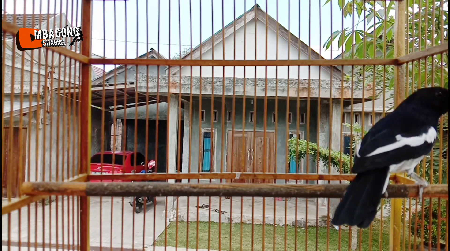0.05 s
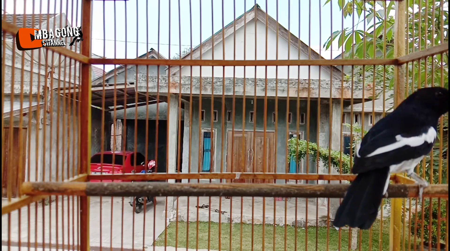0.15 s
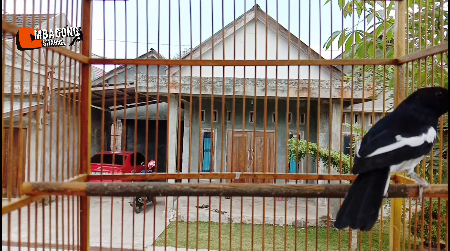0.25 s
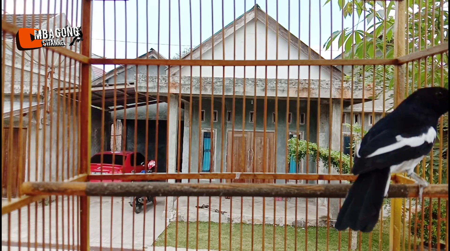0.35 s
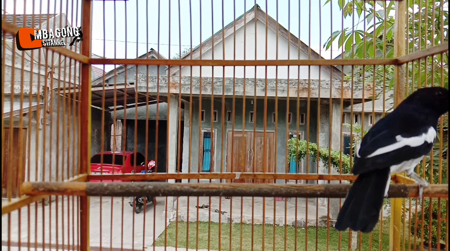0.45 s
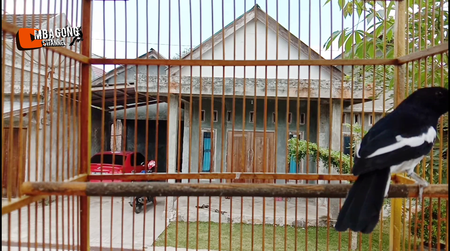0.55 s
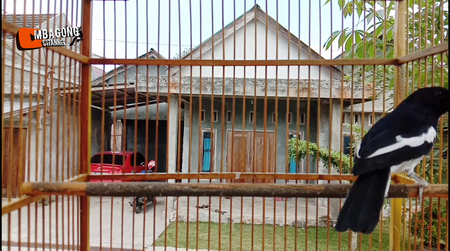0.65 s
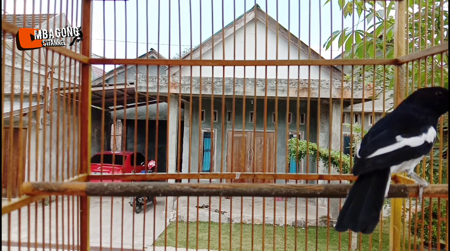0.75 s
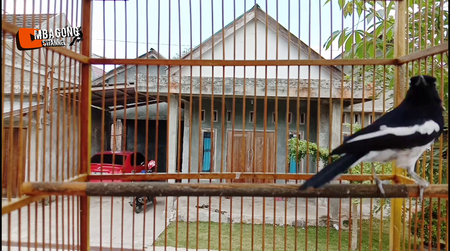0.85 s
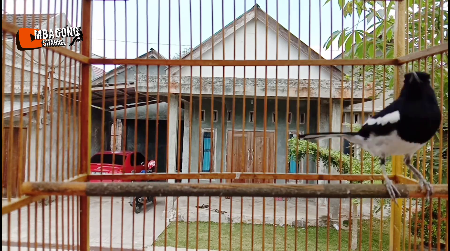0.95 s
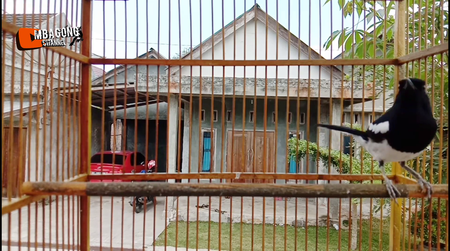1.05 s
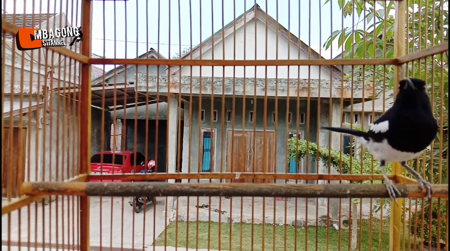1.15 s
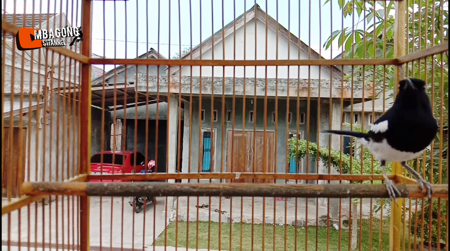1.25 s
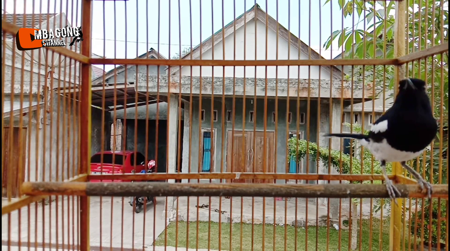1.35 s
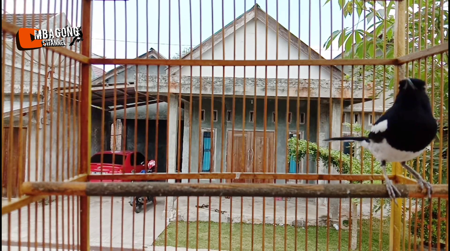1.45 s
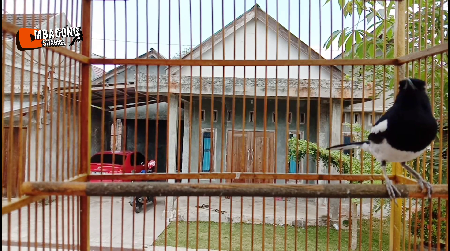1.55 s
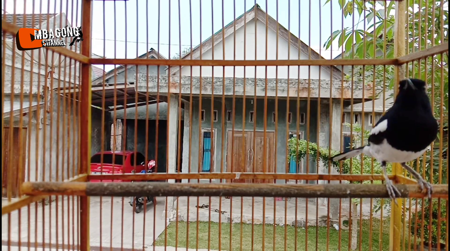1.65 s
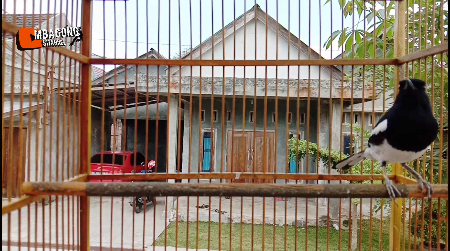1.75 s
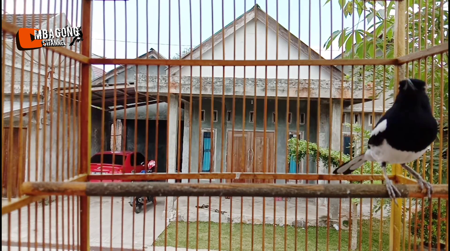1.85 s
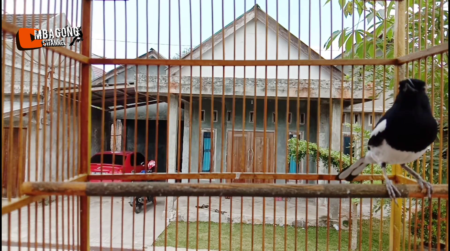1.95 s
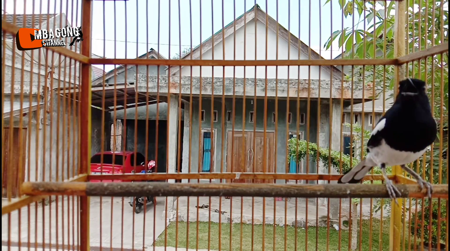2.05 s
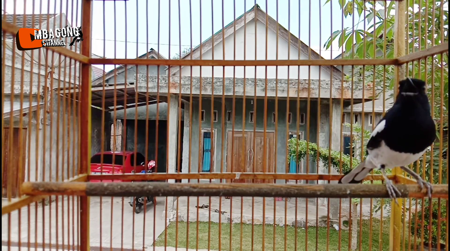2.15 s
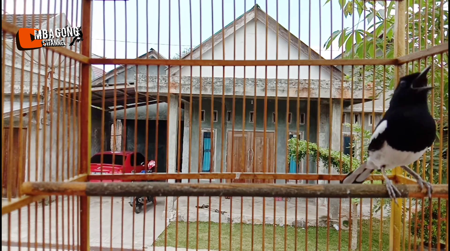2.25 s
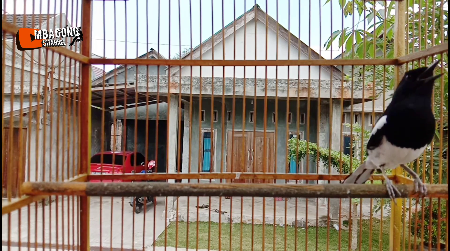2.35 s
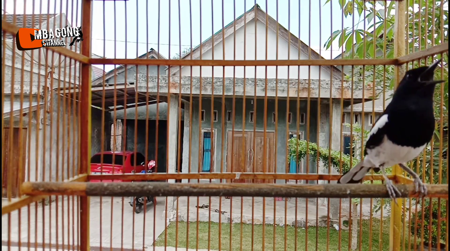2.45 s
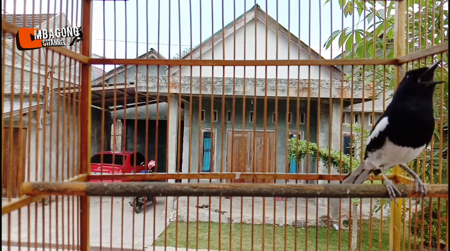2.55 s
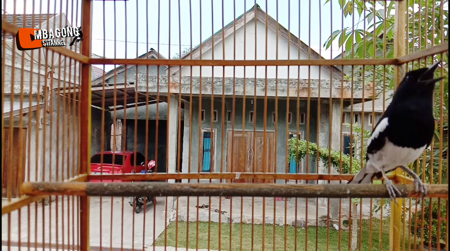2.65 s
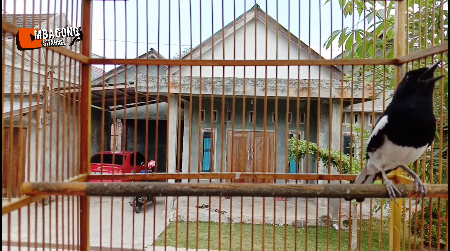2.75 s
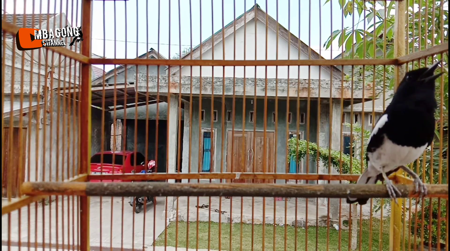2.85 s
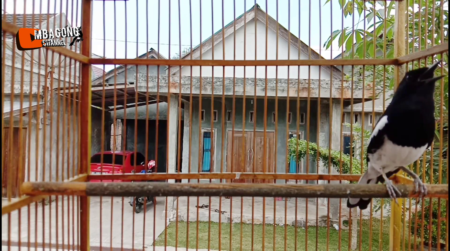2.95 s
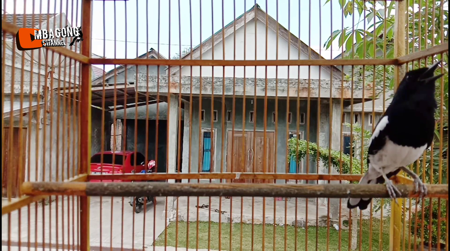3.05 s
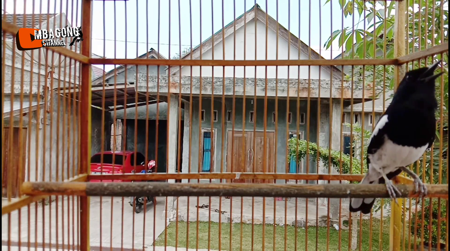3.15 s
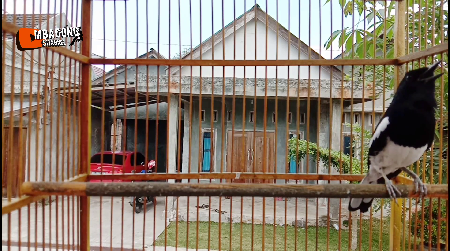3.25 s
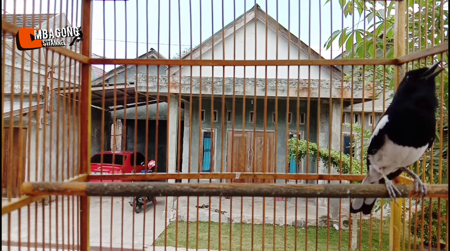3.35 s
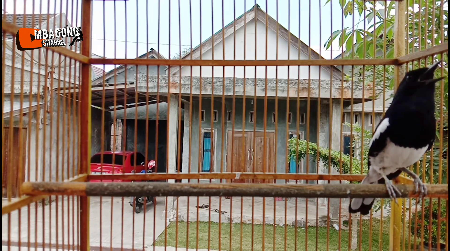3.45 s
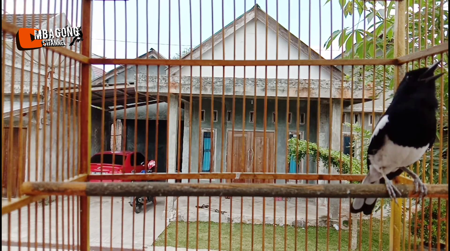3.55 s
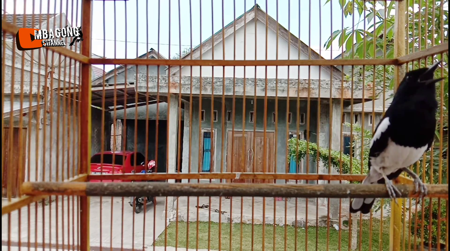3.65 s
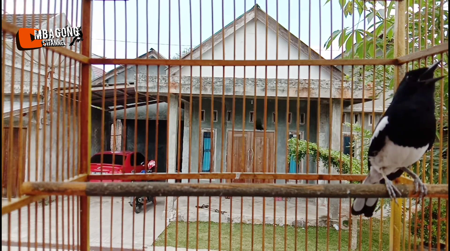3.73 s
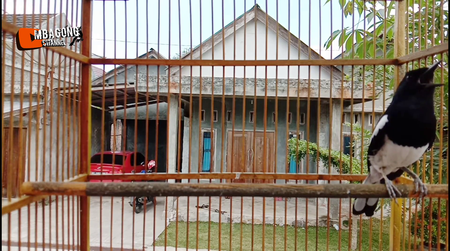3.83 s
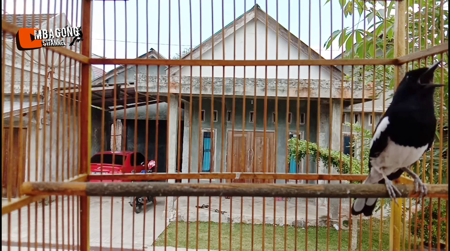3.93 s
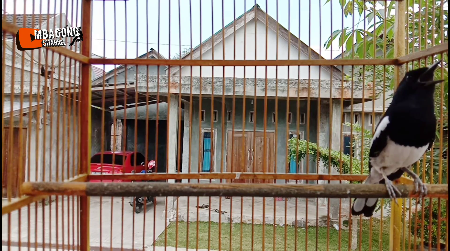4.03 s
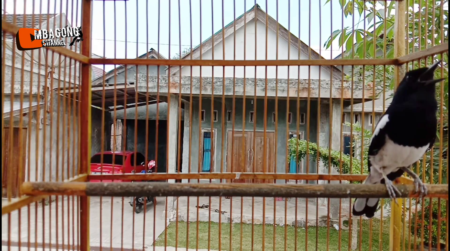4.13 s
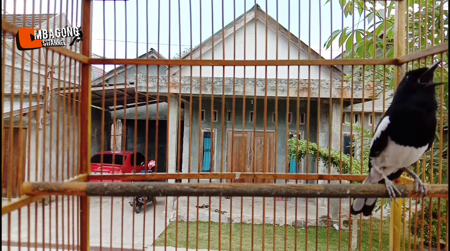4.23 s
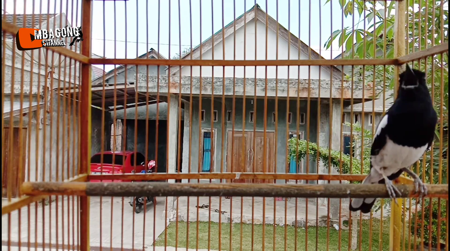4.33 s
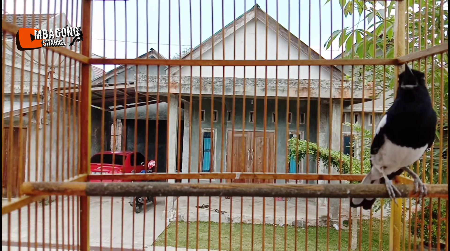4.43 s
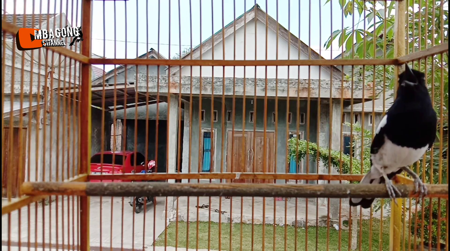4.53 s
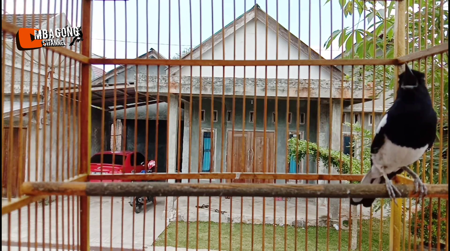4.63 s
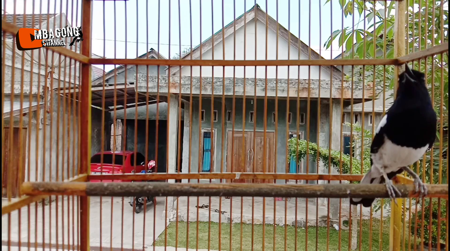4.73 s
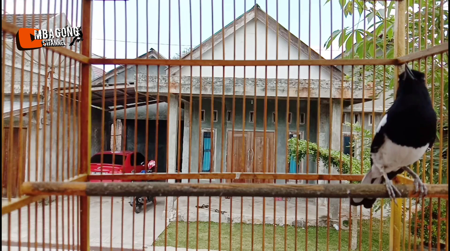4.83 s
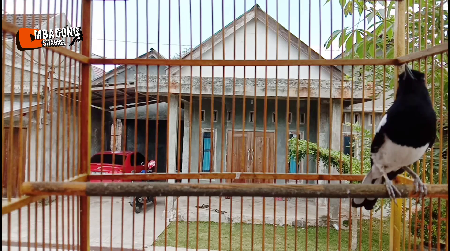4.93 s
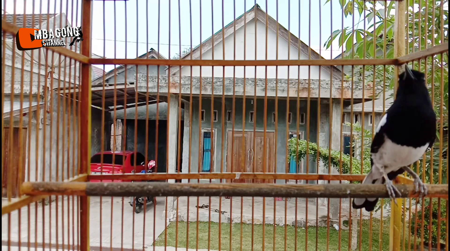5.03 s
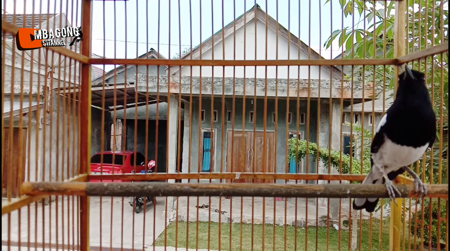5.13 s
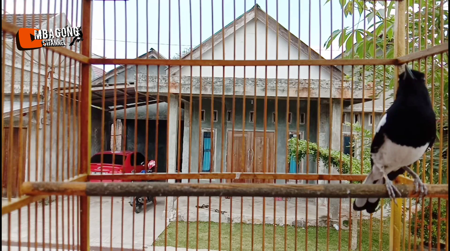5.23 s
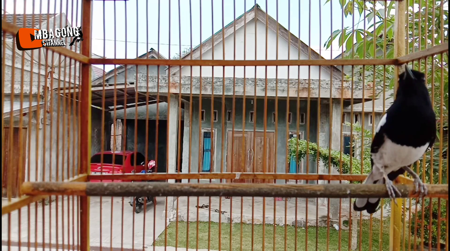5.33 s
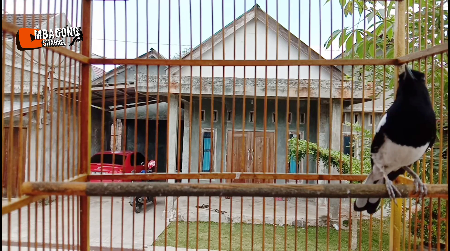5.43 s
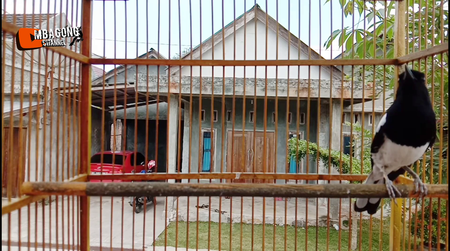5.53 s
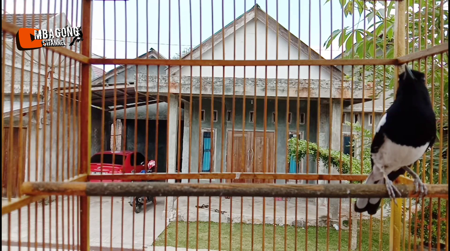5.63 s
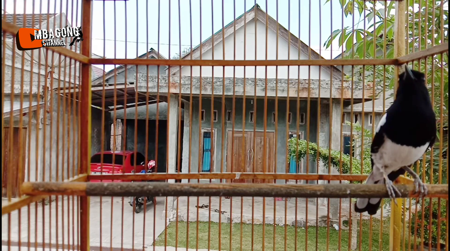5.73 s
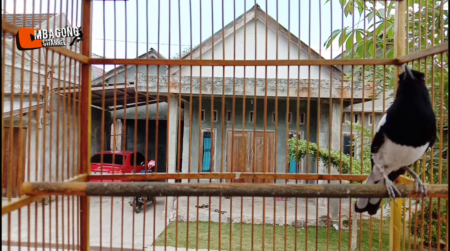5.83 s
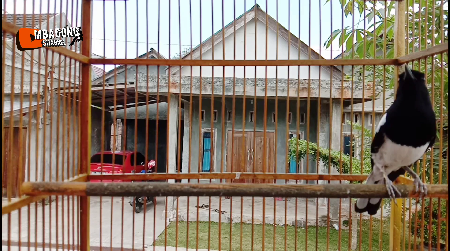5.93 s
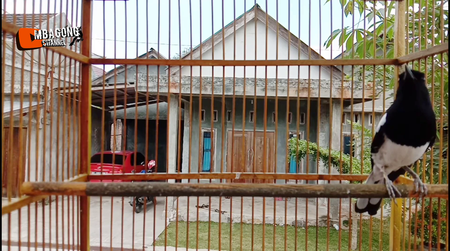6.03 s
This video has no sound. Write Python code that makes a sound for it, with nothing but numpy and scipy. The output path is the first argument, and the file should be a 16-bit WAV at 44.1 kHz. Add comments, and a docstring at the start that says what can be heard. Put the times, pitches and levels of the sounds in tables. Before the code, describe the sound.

A caged songbird sings a loud phrase of clear whistles up close, with distant birds, a rooster and faint traffic behind.

```python
"""A caged magpie-robin sings

The bird sings one loud phrase of whistles close to a camera; twice both sides of its voice box
(the syrinx) sound together. Behind it are far traffic, chattering birds and a distant rooster
ending its crow, and the cage ticks and is bumped. House walls echo, and the camera's automatic
volume control turns the yard down under the song."""
import sys
import numpy as np
from scipy import signal
from scipy.fft import rfft, irfft, next_fast_len
from scipy.io import wavfile
from scipy.ndimage import uniform_filter1d, minimum_filter1d, map_coordinates

SR = 44100
rng = np.random.default_rng(int(sys.argv[2]) if len(sys.argv) > 2 else 0)


def pcm_store(signal):
    """Save signal as 16-bit PCM."""
    levels = np.round(np.clip(np.atleast_2d(signal), -1, 1) * 32767)
    wavfile.write(sys.argv[1], SR, levels.astype(np.int16).T)


N = 268128


def amp(db):
    """Turn decibels into a number to multiply by."""
    return 10 ** (np.asarray(db) / 20)


def unit(x):
    """Scale a signal to an average (rms) size of 1."""
    return x / np.sqrt(np.mean(x ** 2) + 1e-20)


def along(points, hz):
    """Read a (frequency, value) table at hz, on a log frequency scale."""
    freqs, values = np.transpose(points)
    return np.interp(np.log(hz + 1), np.log(freqs + 1), values)


def curves(rows, t):
    """Read each column after the first (time) at the times t."""
    times, *columns = np.transpose(rows)
    return [np.interp(t, np.sort(times), column) for column in columns]


def wobble(rate):
    """A smooth random curve with `rate` new values a second."""
    return map_coordinates(rng.standard_normal(int(N * rate / SR) + 4), [np.arange(N) * rate / SR])


def filtered(x, response):
    """Multiply each frequency in x by response(hz)."""
    size = next_fast_len(N + SR // 2)
    return irfft(rfft(x, size) * response(np.fft.rfftfreq(size, 1 / SR)), size)[:N]


def lowpass(hz, cutoff_hz):
    """A gain that keeps the lows and fades out above the cutoff."""
    return 1 / (1 + (hz / cutoff_hz) ** 4)


def noise(colour):
    """Noise of size 1, shaped by a (frequency, level) table."""
    return unit(filtered(rng.standard_normal(N), lambda hz: amp(along(colour, hz))))


def phase_of(hz):
    """The running angle of a wave whose pitch moves."""
    return 2 * np.pi * np.cumsum(hz) / SR


# How long the walls echo at stretch 1: (frequency [Hz], time to fade by 60 dB [s])
WALL_DECAY = [(300, 0.05), (3000, 0.49), (6000, 0.5), (12000, 0.17)]


def echo(x, stretch):
    """The blurred echo of the yard; a larger stretch makes it last longer."""
    hz, t, spectrum = signal.stft(rng.standard_normal(SR), SR, nperseg=256)
    decay = amp(-60 * t / (stretch * along(WALL_DECAY, hz)[:, None]))
    tail = signal.istft(spectrum * decay, SR, nperseg=256)[1]
    tail *= 1 - np.exp(-np.arange(len(tail)) / SR / 0.012)
    return signal.fftconvolve(x, tail / np.linalg.norm(tail))[:N]


# Single bounces off the porch and the house opposite: (delay [s], level [dB])
WALL_BOUNCES = [(.0052, -21.5), (0.0136, -24.5), (.058, -39), (.088, -35)]


def reflections(x, dull_hz=5200):
    """Delayed copies from the walls, which scatter the treble away."""
    def response(hz):
        copies = sum(amp(db) * np.exp(-2j * np.pi * hz * delay) for delay, db in WALL_BOUNCES)
        return copies * lowpass(hz, dull_hz)
    return filtered(x, response)


# How loud the background is: (time [s], traffic level [dB], air level [dB])
YARD_LEVELS = [(0, -60.5, -56.5), (1.5, -60, -57), (2.05, -57.5, -61), (3.5, -47, -58.5), (4.7, -52.5, -52),
               (5.2, -50, -53), (5.6, -56.5, -56), (6.08, -56, -50.5)]
# Tone colours of the traffic and the air: (frequency [Hz], level [dB])
TRAFFIC_COLOUR = [(20, -21), (50, -12), (85, 2.5), (130, -6), (200, -12.5), (280, -17.5), (400, -21.5),
                  (900, -50.5)]
AIR_COLOUR = [(100, -10), (300, -4), (500, -5), (780, 1), (1250, 2), (1900, -7), (4000, -14), (7500, -19),
              (10000, -30), (15500, -35)]


def yard(t, patchy_db=3):
    """Far traffic rumbles, and outdoor air swells in shifting patches."""
    traffic_db, air_db = curves(YARD_LEVELS, t)
    spectrum = signal.stft(noise(AIR_COLOUR), nperseg=1024)[2]
    patches = uniform_filter1d(rng.standard_normal(spectrum.shape), size=5, axis=0)
    patches = unit(uniform_filter1d(patches, size=12, axis=1))
    air = unit(signal.istft(spectrum * amp(patchy_db * patches), nperseg=1024)[1][:N])
    traffic = amp(traffic_db + 0.83 * wobble(16)) * noise(TRAFFIC_COLOUR)
    return traffic + amp(air_db + 2.3 * wobble(3.87)) * air


# The course of the crow: (time [s], pitch [Hz], relative level [dB], roughness [0-1])
CROW_SHAPE = [(0, 598.5, -28.5, 0.84), (.15, 595.6, -38.5, 0.68), (.25, 596, -37.5, 0.66),
              (.5, 599.5, -35, 0.51), (.7, 583.2, -38, 0.27), (.95, 572.4, -38.5, 0.16),
              (1.05, 550.7, -44.5, 0.52), (1.15, 464.3, -51, 0.3), (1.3, 443.5, -55.5, 0.04),
              (1.55, 412, -52.5, 0.08), (1.7, 400, -62, 0.02)]
# Tone colour of the rooster's throat: (frequency [Hz], level [dB])
THROAT_COLOUR = [(200, -56), (400, -45.5), (610, -24), (830, 5.5), (1000, 2.5), (1180, 1), (1450, 1.5),
                 (1750, -1.5), (2050, -7.5), (2330, -2.5), (2650, -31.5), (3500, -18.5), (9000, -29),
                 (16000, -63)]


def rooster(t, jitter=0.11, rasp=0.5, direct_db=-5, closing_hz=1100):
    """A hoarse crow clears to a held note, then falls and dulls as the beak closes."""
    hz, db, roughness = curves(CROW_SHAPE, t)
    phase = phase_of(hz * (1 + jitter * roughness * wobble(180)))
    harmonics = sum(np.sin(k * phase) for k in range(1, 7))
    voice = unit(filtered(harmonics, lambda f: amp(along(THROAT_COLOUR, f))))
    closed = np.interp(hz, [430, 465], [1, 0])
    voice += closed * (filtered(voice, lambda f: lowpass(f, closing_hz)) - voice)
    noisy_share = np.clip(rasp * roughness, 0, 1)
    level = amp(db - 2 + 0.84 * wobble(12))
    crow = level * (np.sqrt(1 - noisy_share) * voice + np.sqrt(noisy_share) * noise(THROAT_COLOUR))
    return amp(direct_db) * crow + echo(crow, stretch=1.0)


# One bird's falling chips, and quick upward flicks: (time [s], relative level [dB])
FALLING_CHIPS = [(0.043, -42.5), (0.583, -45.5), (1.083, -44.5), (1.684, -45.5)]
RISING_FLICKS = [(.118, -49), (.828, -46)]
# Buzzy trills: (time [s], length [s], relative level [dB])
BUZZY_TRILLS = [(0.22, 0.12, -42), (0.487, 0.093, -44.5), (0.711, 0.14, -54), (1.199, 0.047, -36),
                (1.257, 0.073, -39.5), (1.348, 0.05, -40.5), (1.517, 0.062, -47), (1.883, 0.069, -44),
                (1.955, 0.067, -47.5), (2.691, 0.11, -29), (2.971, 0.077, -35.5), (3.287, 0.21, -43.5),
                (3.475, .1, -36), (3.753, 0.068, -38), (4.222, 0.08, -33.5), (4.961, 0.13, -39.5),
                (5.608, 0.059, -49), (5.684, 0.092, -39)]
# Far whistles: (time [s], length [s], start pitch [Hz], end pitch [Hz], trill depth [Hz],
# relative level [dB])
DISTANT_WHISTLES = [(.283, .55, 8060, 7740, 310, -60), (.803, .04, 4950, 4200, 100, -45),
                    (.838, .035, 6200, 6700, 300, -44), (1.54, .05, 6050, 5900, 250, -44.5),
                    (1.658, 0.072, 2400, 2770, 300, -50), (4.94, 0.16, 2278, 2388, 17, -41.5),
                    (5.061, .14, 2447, 2716, 115, -34.5), (5.355, 0.14, 2471, 2614, 10, -33),
                    (5.476, .094, 2866, 3374, 260, -32.5), (5.578, 0.091, 2763, 2782, 182, -38),
                    (5.944, 0.077, 4534, 4484, 240, -37)]
# Tone colour of the buzz around a trill: (frequency [Hz], level [dB])
BUZZ_COLOUR = [(2000, -46.5), (3500, 1), (5500, 0.5), (6600, -13.5), (7400, 0), (8400, -12), (9500, -29),
               (16000, -40)]


def chatter(t, trill_hz=42, deep_trill_hz=720, echo_db=-2, direct_db=-4, buzz_db=-13):
    """Far birds trill and glide, heard mostly by way of the walls; deep trills carry a buzz."""
    # give every call the same columns as the far whistles
    rows = [(start, 0.1, 5150, 2600, 470, db) for start, db in FALLING_CHIPS]
    rows += [(start, length, 5400, 4600, deep_trill_hz, db) for start, length, db in BUZZY_TRILLS]
    rows += [(start, .02, 4900, 7700, 86, db) for start, db in RISING_FLICKS]
    rows += DISTANT_WHISTLES
    calls, buzz = np.zeros((2, N))
    scatter, pace = wobble(260), wobble(25)
    pulsing = amp(2.5 * wobble(90))
    for start, length, start_hz, end_hz, depth_hz, db in rows:
        span = (t > start) & (t < start + length)
        progress = (t[span] - start) / length
        # each turn of the trill jumps up and slides down
        turn = phase_of(trill_hz * (1 + 0.21 * pace[span])) + rng.uniform(0, 2 * np.pi)
        trill = signal.sawtooth(turn, .25) + .38 * scatter[span]
        phase = phase_of(start_hz + (end_hz - start_hz) * progress + depth_hz * trill)
        swell = amp(db) * pulsing[span] * np.sqrt(2) * np.sin(np.pi * progress)
        calls[span] += swell * (np.sin(phase) + amp(-39) * np.sin(2 * phase))
        buzz[span] += swell * depth_hz / deep_trill_hz
    calls += amp(buzz_db) * buzz * noise(BUZZ_COLOUR)
    return amp(direct_db) * calls + amp(echo_db) * echo(calls, stretch=1.08)


# Claws on the cage: (time [s], relative level [dB])
CLAW_TICKS = [(0.9522, -28), (0.9768, -30.5), (5.8248, -25.5)]
# The bump: (time [s], thud level [dB], rustle level [dB])
BUMP_LEVELS = [(5.815, -92.5, -94), (5.83, -40.5, -40.5), (5.87, -46.5, -39.5), (5.93, -52, -39),
               (6.0, -81, -47), (6.08, -62, -51)]
# Tone colours of the ticks, the thud and the rustle: (frequency [Hz], level [dB])
CLAW_COLOUR = [(1500, -17), (4000, 10), (7200, 14), (9500, -8.5), (13000, 3), (15300, -20)]
THUD_COLOUR = [(40, -17.5), (110, -7.5), (230, -6), (450, -18), (1000, -19), (2500, -43)]
RUSTLE_COLOUR = [(880, -38.5), (1500, -30), (2230, -11.5), (3550, -2.5), (5600, -4), (6500, -13.5),
                 (7540, -5), (9370, -30.5), (16000, -38.5)]


def cage(t, tick_db=-7, tick_decay_s=.004):
    """Claws tick on the cage, and a bump leaves the thin bars rustling."""
    taps = sum(amp(db + tick_db) * np.exp(-np.abs(t - start) / tick_decay_s) * (t >= start)
               for start, db in CLAW_TICKS)
    ticks = taps * noise(CLAW_COLOUR)
    thud_db, rustle_db = curves(BUMP_LEVELS, t)
    rustle = amp(rustle_db + 1.1 * wobble(120)) * noise(RUSTLE_COLOUR)
    return ticks + amp(-4.5) * echo(ticks, stretch=0.55) + amp(thud_db) * noise(THUD_COLOUR) + rustle


def whistle(t, start, hold, dive_s, octaves, start_hz, crest_hz, end_hz, crest, slur,
            db, swell_s, fade_db, first_db, middle_db, last_db, rasp_db,
            attack_s=.002, brighten_s=.0059, thinning_db=10.5, thinning_s=.0068):
    """A note arches and breaks off in a dive: gives its span, pitch, and tone, overtone, rasp levels."""
    span = (t > start) & (t < start + hold + dive_s)
    age = t[span] - start
    progress = age / hold
    dive = np.maximum(age - hold, 0) / dive_s
    crest = np.clip(crest, .02, .98)
    rise = np.sin(np.pi / 2 * np.minimum(progress / crest, 1)) ** slur
    sag = np.clip((progress - crest) / (1 - crest), 0, 1) ** 2
    arch_hz = start_hz + (crest_hz - start_hz) * rise + (end_hz - crest_hz) * sag
    hz = arch_hz * 2 ** (-octaves * dive ** 1.3)
    gate = np.sin(np.pi / 2 * np.minimum(age / attack_s, 1)) ** 2 * np.abs(1 - dive) ** 1.4
    effort = 1 - 0.85 * np.exp(-age / swell_s)  # a little sounds at once, the rest swells in
    dive_loss_db = thinning_db * (1 - np.exp(-dive * dive_s / thinning_s))
    level = gate * effort * amp(db - fade_db * sag - dive_loss_db)
    bright = gate * amp(np.interp(progress, [0, .5, 1], [first_db, middle_db, last_db]))
    # the voice catches as it starts and as it breaks
    start_rasp = bright * amp(-8) * np.exp(-(age / .005) ** 2)
    break_rasp = level * amp(rasp_db) * np.exp(-((age - hold) / .008) ** 2)
    bright *= np.minimum(age / brighten_s, 1)  # overtones come in just after the tone
    return span, hz, level, bright, start_rasp + break_rasp


def warble(t, start, length, start_hz, end_hz, rate, db, fade_db, rasp_db,
           depth_hz=167, dip_db=2, overtone_db=-23.5, edge_s=.002):
    """A hoarse shake of the pitch, quieter at the top of each shake: gives the same parts as whistle."""
    span = (t > start) & (t < start + length)
    age = t[span] - start
    progress = age / length
    shake = -np.sin(2 * np.pi * rate * age)
    hz = start_hz + (end_hz - start_hz) * progress + depth_hz * shake
    gate = np.minimum(np.minimum(age, length - age) / edge_s, 1)
    level = gate * amp(db - fade_db * progress - dip_db * shake)
    return span, hz, level, amp(overtone_db) * level, amp(rasp_db) * level


# The song: (time [s], hold [s], dive length [s], dive depth [octaves], start pitch [Hz],
# crest pitch [Hz], end pitch [Hz], place of the crest in the hold [0-1], slur [small = quick scoop],
# level [dB], swell [s], fade [dB], overtones at the start [dB], in the middle [dB], at the end [dB],
# relative rasp at the break [dB])
SONG_WHISTLES = [(2.079, 0.078, 0.0036, .05, 3470, 3498, 3220, .25, 5, 9.9, .012, 4.5, -20, -28.5, -13.5, -33.5),
                 (2.182, 0.18, 0.011, 0.19, 3625, 3968, 3621, 0.26, 1.6, 6.36, 0.029, -6, -26, -9, -17, -40),
                 (2.465, 0.068, 0.047, 0.84, 3560, 3627, 3600, .35, 3.8, 10.9, 0.015, -4, -10.5, -13, -9.5, -29),
                 (2.513, .036, 0.023, .65, 4067, 4000, 3593, 0.19, 1.6, 1.1, 0.01, -11, -13.5, -17.5, -12.5, -15.5),
                 (2.563, 0.098, .003, 0.06, 2838, 3562, 3670, .1, 2.2, 13.7, 0.014, 1.5, -22, -9, -9.5, -35.5),
                 (2.844, 0.11, 0.014, 0.39, 2513, 2673, 2730, 0.37, 5.8, 7.7, 0.031, -0.5, -9, -30, -15.5, -32.5),
                 (3.03, 0.11, 0.021, .4, 2452, 2660, 2517, .92, 0.54, 8.44, 0.031, 10, -11, -19.5, -16.5, -35.5),
                 (3.221, .1, .018, 0.32, 2413, 2513, 2477, 0.22, 4.7, 8.8, 0.017, 4.5, -11.5, -18.5, -11, -21),
                 (3.391, 0.04, 0.0059, 0.026, 2280, 2474, 2464, .58, 1.65, 7.8, 0.019, -0.5, -16.5, -15.5, -11.5, -38.5),
                 (3.434, 0.065, 0.0082, 0.19, 2498, 3112, 3047, 0.35, 0.72, 10.3, .005, -4.5, -20.5, -16, -14, -48.5),
                 (3.612, .131, .016, 0.3, 3020, 3384, 3017, .57, 0.45, 11.7, 0.024, -6, -16.5, -16, -7, -31),
                 (3.867, .205, .012, .42, 3879, 4666, 4692, .77, 1.8, 9.8, 0.035, 2.5, -7, -22.5, -22, -44),
                 (4.197, .234, 0.027, 0.56, 3106, 3556, 3648, .4, .45, 12, 0.022, -1.5, -17.5, -18, -15, -41.5),
                 (4.494, 0.057, .024, 0.73, 3448, 3638, 3425, .7, 5.5, 13, 0.039, 0.5, -23.5, -23.5, -10, -25.5),
                 (4.654, 0.07, .022, 0.75, 3566, 3700, 3550, .61, 2.5, 10.7, 0.015, -0.5, -16.5, -20, -10.5, -26)]
# Fast shakes that close two whistles: (time [s], length [s], start pitch [Hz], end pitch [Hz],
# shakes [per s], level [dB], fade [dB], relative rasp [dB])
SONG_WARBLES = [(2.161, .04, 3246, 2968, 84, 8, 3.5, -26), (2.665, .03, 3843, 4046, 57, 16.5, 15.5, -43)]
# Fainter tones above each note: (multiple of the pitch, relative level [dB])
SONG_OVERTONES = [(2, 5), (3, -3), (4, -15), (5, -19.5), (6, -7)]
# Tone colours of the overtones and the rasp: (frequency [Hz], level [dB])
BEAK_COLOUR = [(4500, 3.5), (6200, -6), (7500, 0.5), (9000, -4), (11500, -4), (13500, -5.5), (14400, -3.5),
               (15600, -18.5), (16000, -22)]
VOICE_RASP_COLOUR = [(200, -27.5), (380, -8), (1200, -29), (2200, -9), (3500, 25.5), (5500, 4), (7500, 8),
                     (9500, -12.5), (13000, -15.5), (15200, -22.5), (16000, -17)]


def robin(t, shimmer_db=2, coupling_db=-32, rasp_db=3, ring_hz=15100, ring_width_hz=380, ring_db=-25):
    """Nearly pure whistles; where two overlap, the sides of the voice box beat and make sum tones."""
    pure, squares, overtones, rasp_level = np.zeros((4, N))
    waver = 1 + .0018 * wobble(200) + .0037 * wobble(55)
    flutter = amp(.3 * wobble(180) + 1.06 * wobble(60))
    tremor = wobble(450)
    grits = [wobble(900) for _ in SONG_OVERTONES]
    shimmers = [amp(shimmer_db * wobble(70)) for _ in SONG_OVERTONES]
    notes = [whistle(t, *row) for row in SONG_WHISTLES] + [warble(t, *row) for row in SONG_WARBLES]
    for span, hz, level, bright, rasp in notes:
        # a rasping voice also loses its steady pitch
        roughness = np.minimum(rasp / (level + 1e-6), .12)
        hz = hz * (waver[span] + 0.26 * roughness * tremor[span])
        phase = phase_of(hz)
        tone = np.sqrt(2) * level * flutter[span] * np.sin(phase)
        pure[span] += tone
        squares[span] += tone ** 2
        rasp_level[span] += np.sqrt(2) * rasp
        # a narrow high resonance lifts any overtone that crosses it, most on low notes
        ring = level * amp(ring_db) * (3000 / np.maximum(hz, 2450)) ** 5
        for (multiple, db), shimmer, grit in zip(SONG_OVERTONES, shimmers, grits):
            overtone_hz = multiple * hz
            gain = bright * amp(db + along(BEAK_COLOUR, overtone_hz)) * (overtone_hz < SR / 2)
            gain += ring / (1 + ((overtone_hz - ring_hz) / ring_width_hz) ** 4)
            hoarseness = (.03 + 1.5 * roughness) * grit[span]
            overtones[span] += np.sqrt(2) * gain * shimmer[span] * np.sin(multiple * (phase + hoarseness))
    # the two voices multiply, and only the high part leaves the beak
    sum_tones = filtered(pure ** 2 - squares, lambda hz: 1 - lowpass(hz, 4500))
    rasp_noise = amp(rasp_db) * rasp_level * noise(VOICE_RASP_COLOUR)
    return pure + overtones + amp(coupling_db) * sum_tones + rasp_noise


def scene(echo_db=-28):
    """The near singer and its echoes over the other sounds of the yard, in mono."""
    t = np.arange(N) / SR
    song = robin(t)
    near = song + reflections(song) + amp(echo_db) * echo(song, stretch=0.75)
    return (near + chatter(t) + rooster(t) + cage(t) + yard(t))[None]


def record(dry, threshold_db=-14, max_cut_db=14, release_db_per_s=105, top_hz=15900):
    """The volume control drops at once on loud notes and creeps back; the highest treble is cut off."""
    peak_db = 20 * np.log10(-minimum_filter1d(-np.abs(dry[0]), size=180) + 1e-9)
    needed_db = np.clip(peak_db - threshold_db, 0, max_cut_db)
    needed_db = np.maximum(needed_db, peak_db + .1)  # cut more only if a peak would overload
    creep_db = release_db_per_s * np.arange(N) / SR
    cut_db = uniform_filter1d(np.maximum.accumulate(needed_db + creep_db) - creep_db, size=90)
    # a fine trim reads the level only every 20 ms, so its steps crackle faintly on loud notes
    block, first = SR // 50, int(.012 * SR)
    readings_db = (peak_db - cut_db)[first::block]
    held_db = np.pad(np.repeat(readings_db, block), (first, 0), mode="edge")[:N]
    trim_db = uniform_filter1d(.4 - .2 * np.clip(held_db + 6, 0, None), size=12)
    return filtered(dry[0] * amp(trim_db - cut_db), lambda hz: hz < top_hz)[None]


dry = scene()
out = record(dry)
pcm_store(out)
```